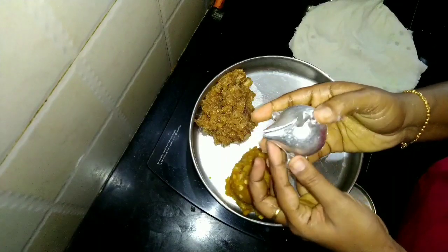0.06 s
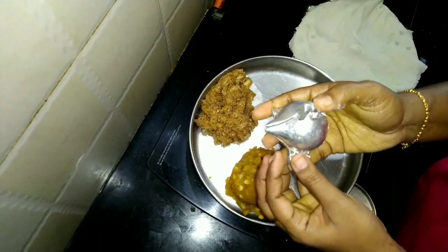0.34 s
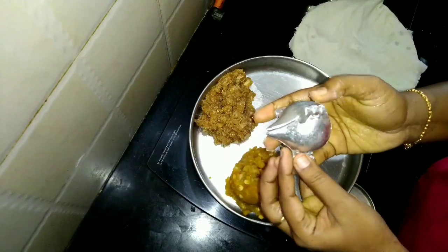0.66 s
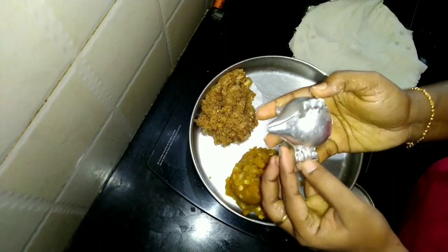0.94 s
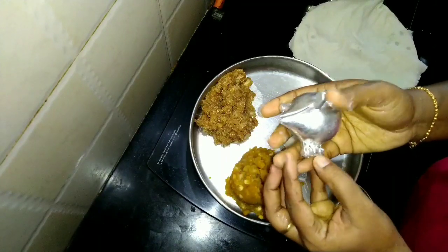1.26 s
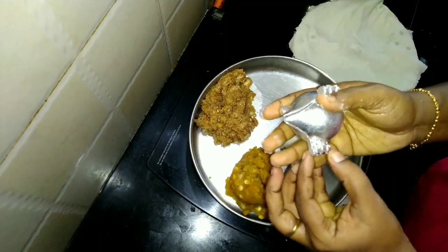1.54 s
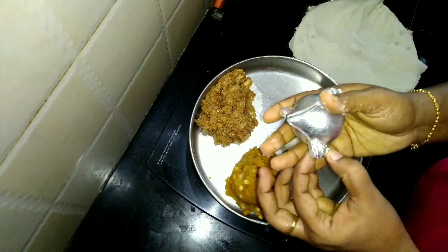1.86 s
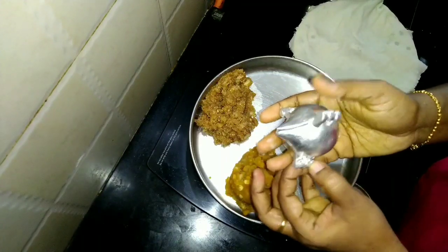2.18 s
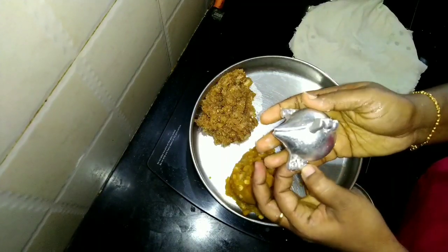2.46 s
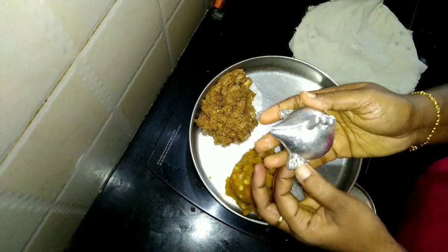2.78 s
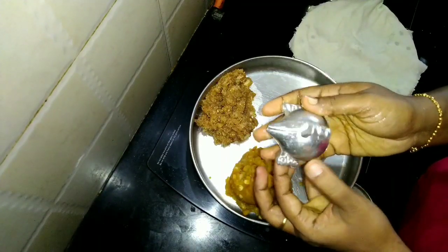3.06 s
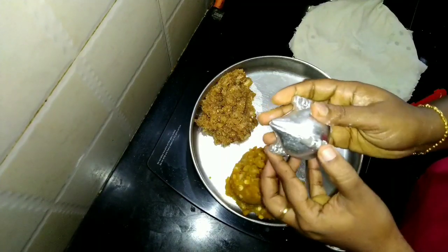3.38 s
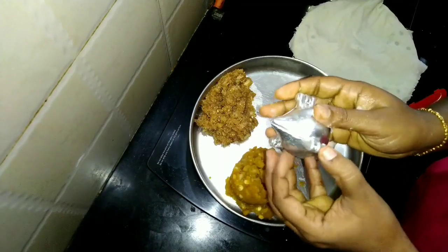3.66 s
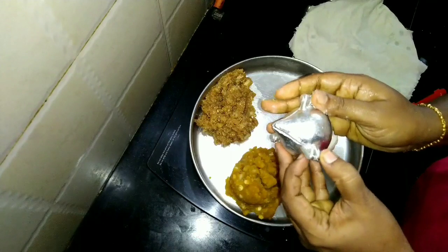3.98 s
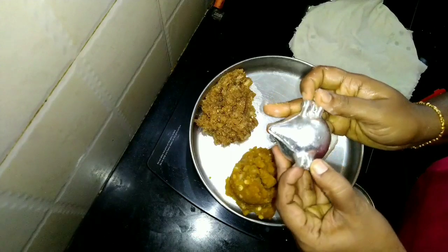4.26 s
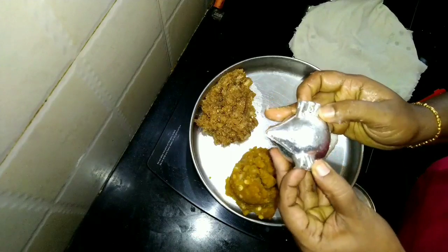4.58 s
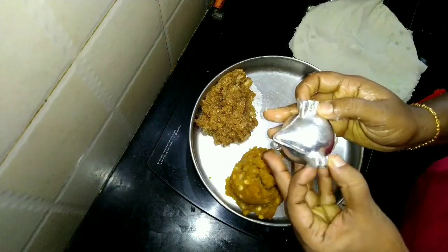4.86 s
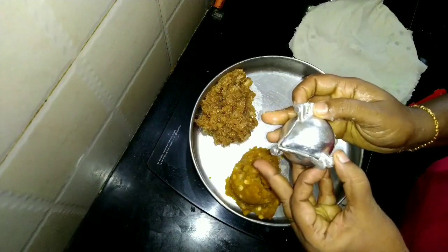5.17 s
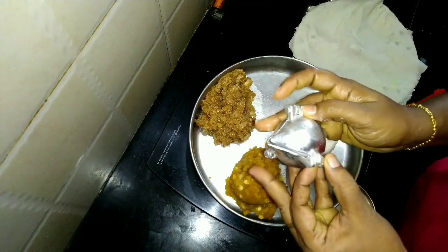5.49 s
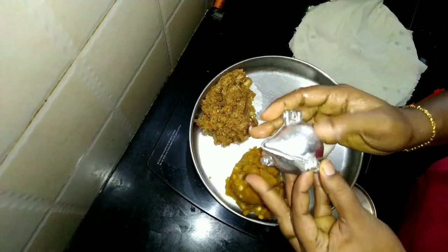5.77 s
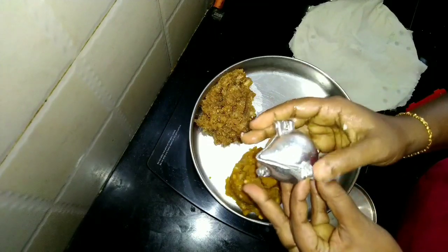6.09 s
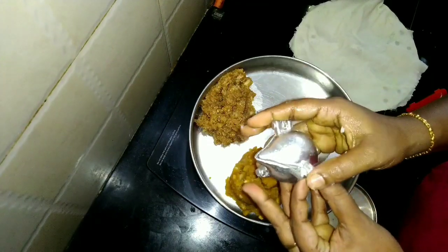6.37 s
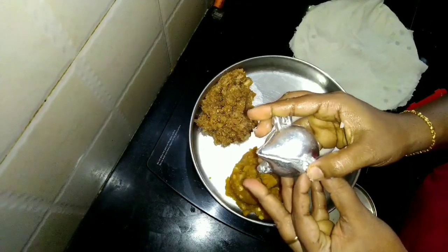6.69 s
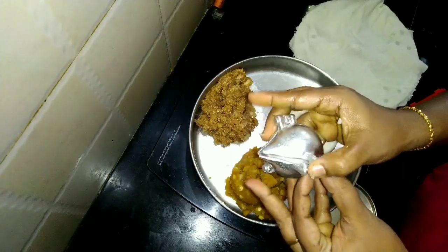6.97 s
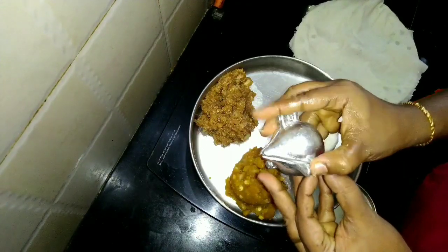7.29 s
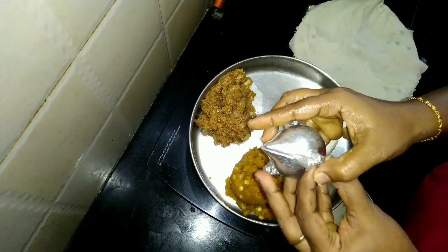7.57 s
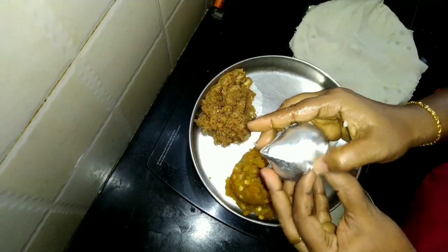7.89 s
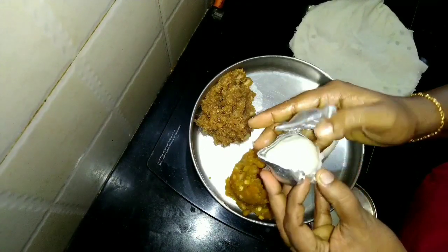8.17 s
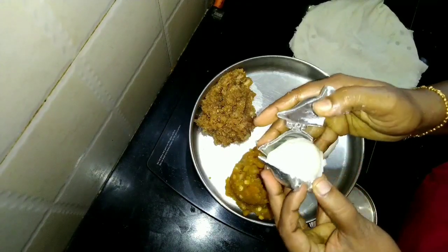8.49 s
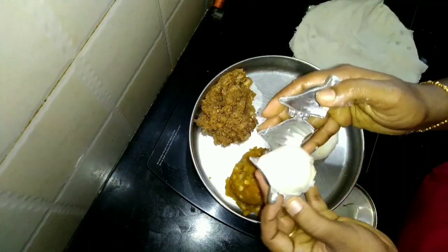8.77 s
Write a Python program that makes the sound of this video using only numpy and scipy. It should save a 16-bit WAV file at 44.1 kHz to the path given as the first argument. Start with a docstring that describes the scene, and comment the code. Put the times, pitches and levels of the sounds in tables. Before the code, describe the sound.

A quiet kitchen holds a faint refrigerator hum, light hiss and the dull drone of distant traffic throughout. From about 0.5 to 1.5 seconds, soft low bumps buffet the microphone on the left side. After a lull, a denser, stronger spell of bumps runs from 3.7 to 5 seconds, loudest just after 4, with very faint, brief high swishes as fingers work a small metal mould. At 5.6 seconds the mould gives one short dull tick, close and slightly left. A few more barely audible swishes come between 6.3 and 7.5 seconds. A short, firm cluster of low bumps lands around 6.9 seconds, with weaker ones near 7.3 to 7.5. The far traffic swells gently around 7 seconds, and the hiss lifts slightly with the louder bumps. Only hum, hiss and faint engine drone remain until the end, near 9 seconds.

```python
"""Soft low bumps buffet the left microphone port in spells, each push ringing its resonant bass cut.
In a quiet kitchen two hands ease a small metal mould open, and one dull tick rings in damped modes.
Narrow bands of noise make faint, brief high swishes. A refrigerator hums at harmonics of its rotor
and the mains, and far traffic drones through the walls. The recorder's noise suppressor raises
its gain with the louder spells, so the hiss rises with them."""
import sys
import numpy as np
from scipy import signal
from scipy.fft import rfft, irfft
from scipy.io import wavfile
from scipy.ndimage import uniform_filter1d, minimum_filter1d

SR = 44100
rng = np.random.default_rng(int(sys.argv[2]) if len(sys.argv) > 2 else 0)


def int16_out(signal):
    """Quantize to a 16-bit WAV file."""
    q = np.round(np.clip(np.atleast_2d(signal).T, -1, 1) * 32767)
    wavfile.write(sys.argv[1], SR, q.astype(np.int16))


N = 389844
T = np.arange(N) / SR

# Room murmur. Each row: frequency in Hz, relative spectral density in dB.
ROOM_SPECTRUM = [(20, -43), (40, -17.5), (59, 1.5), (82, -9), (150, -7.5), (185, -12), (240, -13),
                 (305, -13.5), (370, -19), (600, -23), (1000, -34.5), (2500, -48)]
# Likeness of the room sound at the two ports. Each row: frequency in Hz, correlation from 0 to 1.
ROOM_COHERENCE = [(60, 0.72), (300, 0.87), (700, 0.75), (1500, 0)]
# Microphone hiss. Each row: frequency in Hz, relative spectral density in dB.
HISS_SPECTRUM = [(100, -9.5), (800, 4), (2000, 1.5), (4200, -0.5), (6200, -5), (7500, -13), (8600, -13),
                 (10500, -5.5), (12500, -4.5), (15000, -7.5)]
# Faint electronic whistles. Each row: frequency in Hz, left level in dB, right level in dB.
WHISTLES = [(2589, -93, -93), (4640, -100, -92), (5797, -100, -87), (9275, -105, -94), (10438, -105, -93),
            (13915, -94, -91), (14755, -88, -100)]
# Compressor tones. Each row: multiple of the rotor speed, level in dB, right-port lag in radians.
ROTOR_HARMONICS = [(3, -77.5, -1.5), (4, -64.5, -0.021), (5, -70.5, -0.87), (8, -77.5, 1.45),
                   (9, -75, -1.9), (10, -61.5, 0.18), (11, -77.5, -2.1), (12, -87, 2.2), (13, -83, 1.44),
                   (14, -82.5, 3), (15, -82.5, 1.75), (19, -85, 1.5)]
# Magnetic hum. Each row: multiple of the mains frequency, level in dB, right-port lag in radians.
MAINS_HARMONICS = [(2, -69, 0.02), (3, -76.5, 0.014), (4, -65, 0.037)]
# Course of a thin tone. Each row: time in seconds, frequency in Hz, level in dB.
TONE_COURSE = [(0, 331, -77), (.55, 326.9, -67), (1.6, 329.4, -70.5), (2.9, 330.7, -71), (4, 329.4, -71),
               (8.84, 330.5, -80.5)]
# Pulls of far engines. Each row: start and end in seconds, starting and settled rate in Hz,
# starting and final level in dB.
ENGINE_PULLS = [(0, 2.4, 54.4, 54.26, -63.5, -57.5), (2.6, 3.9, 64, 65.8, -61, -59),
                (5.55, 6.17, 53.3, 55.36, -51.5, -49), (6.6, 10.2, 69.8, 68.7, -66.5, -53),
                (7.68, 9.7, 103.9, 104.6, -57, -74)]
# Traffic drone. Each row: frequency in Hz, relative spectral density in dB.
TRAFFIC_SPECTRUM = [(60, -32), (115, -11.5), (140, 3.5), (160, 4), (195, -11), (240, -9.5), (300, -4.5),
                    (360, -15.5), (700, -28), (1400, -58)]
# Its one swell. In order: time of the top in seconds, level there in dB, rise and fall in dB per second.
TRAFFIC_SWELL = (7, -59, 2, 6.5)
# Prominent pushes at the left port. Each row: centre in seconds, level in dB, pitch in Hz.
BUMPS = [(0.452, -37.5, 86), (0.471, -31.5, 90), (0.5127, -40, 80), (0.562, -42.5, 58), (0.625, -47, 58),
         (0.7447, -34, 64), (0.8515, -37, 85), (0.8845, -33, 85), (0.9252, -33.5, 68.4), (0.983, -35, 56),
         (1.043, -35.5, 76), (1.091, -40.5, 62), (1.224, -35, 88.6), (1.248, -42, 85), (1.298, -33, 73),
         (1.356, -40, 68), (3.7317, -34, 82), (3.786, -38.5, 85), (3.8155, -31, 87.5), (3.8951, -29, 64),
         (3.9633, -29.5, 78), (3.9847, -25, 71.4), (4.019, -33, 69), (4.0495, -36, 100), (4.068, -31, 105),
         (4.0804, -30.5, 128.5), (4.1135, -21.5, 94), (4.1447, -26, 77), (4.2113, -37, 85),
         (4.263, -26, 83), (4.277, -23.5, 112.5), (4.306, -26, 90), (4.3209, -26, 71), (4.354, -35, 121),
         (4.367, -28.5, 89), (4.396, -31, 80.5), (4.4343, -26, 90.5), (4.4576, -29, 95), (4.479, -32.5, 80),
         (4.5248, -29.5, 85), (4.591, -34.5, 70), (4.6087, -34, 73.7), (4.6508, -30.5, 102),
         (4.6758, -28.5, 83), (4.7047, -31.5, 89), (4.7248, -32.5, 85), (4.757, -36, 62), (4.885, -41, 64),
         (4.954, -44, 62.5), (6.836, -37.5, 65.7), (6.8676, -23.5, 101.4), (6.8818, -23.5, 87),
         (6.9013, -25, 88), (6.924, -26.5, 98), (6.9907, -22, 91), (7.0442, -35, 66), (7.3013, -33, 81),
         (7.344, -48, 62), (7.428, -33.5, 95.6), (7.438, -44, 80)]
# Spells of buffeting. Each row: start and end in seconds, level at the middle in dB,
# drop toward the ends in dB (negative for a rise), lowest pitch in Hz.
BUFFET_SPELLS = [(0.452, 0.58, -53, 2, 55), (0.851, 1.46, -53, -2, 54), (3.699, 3.93, -49, -6.5, 60),
                 (3.962, 4.38, -42.5, 7, 72), (4.421, 4.782, -46.5, 4, 63.6), (4.838, 4.982, -59, -7, 55),
                 (6.85, 6.96, -43, -1, 85), (7.3, 7.56, -60, -9, 66)]
# Faint, brief high swishes. Each row: start and end in seconds, level in dB, band centre in Hz.
HIGH_SWISHES = [(3.75, 3.82, -74, 4970), (3.8, 3.89, -79, 6400), (4.05, 4.14, -73, 4950),
                (4.33, 4.45, -75, 4980), (6.33, 6.37, -74, 5000), (6.4, 6.5, -77, 6100),
                (6.4, 6.48, -73, 3400), (6.65, 6.72, -75, 4950), (7.15, 7.5, -82, 3900)]
# The dull tick. In order: start in seconds, level in dB.
TICK = (5.5802, -27.5)
# Its modes. Each row: frequency in Hz, relative level in dB, time to decay by 60 dB in seconds.
TICK_MODES = [(357, -3, 0.0075), (714, -2, 0.0053), (1300, -14, 0.008), (4330, -11, 0.007)]


def amp(db):
    """Amplitude grows tenfold for every 20 dB."""
    return 10 ** (np.asarray(db) / 20)


def unit_rms(x):
    """Dividing by the root mean square gives a signal unit power."""
    return x / np.sqrt(np.mean(x ** 2) + 1e-20)


def at_frequency(table, hz):
    """A spectrum is interpolated on a logarithmic frequency axis."""
    table_hz, values = np.transpose(table)
    return np.interp(np.log(hz + 1), np.log(table_hz), values)


def drift(hz):
    """Low-passed noise of unit power fluctuates at rates up to about hz."""
    bin_hz = np.fft.rfftfreq(N, 1 / SR)
    return unit_rms(irfft(rfft(rng.standard_normal(N)) / (1 + (bin_hz / hz) ** 4), N))


def running_phase(hz):
    """Phase is the integral of frequency, here from a random start."""
    return 2 * np.pi * (np.cumsum(hz * np.ones(N)) / SR + rng.random())


def gate(start, end, attack_s, release_s, t=T):
    """An envelope grows exponentially to 1 at start, holds, and decays after end."""
    return np.exp(np.minimum(t - start, 0) / attack_s - np.maximum(t - end, 0) / release_s)


def progress(start, end, t=T):
    """A linear ramp runs from 0 at start to 1 at end."""
    return np.clip((t - start) / (end - start), 0, 1)


def noise_pair(spectrum, coherence=None):
    """Coloured noise at two ports is coherent to the extent that they share a component."""
    hz = np.fft.rfftfreq(N, 1 / SR)
    left, independent = rfft(rng.standard_normal((2, N)))
    shared = np.clip(at_frequency(coherence, hz), -1, 1) if coherence else 0
    right = shared * left + np.sqrt(1 - shared ** 2) * independent
    return unit_rms(irfft(np.array([left, right]) * amp(at_frequency(spectrum, hz)), N))


def noise_floor(room_db=-58, hiss_db=-63, flicker_db=0.51, patchy_db=0.5):
    """Room murmur is partly coherent between the ports; each adds its own hiss and faint whistles."""
    whistles = sum(amp([[left_db], [right_db]]) * np.sqrt(2) * np.sin(running_phase(hz))
                   for hz, left_db, right_db in WHISTLES)
    # the hiss wavers in small patches of frequency and time
    spectrogram = signal.stft(noise_pair(HISS_SPECTRUM), nperseg=1024)[2]
    patches = uniform_filter1d(rng.standard_normal(spectrogram.shape[1:]), size=24, axis=0)
    patches = unit_rms(uniform_filter1d(patches, size=10, axis=1))
    hiss = signal.istft(spectrogram * amp(patchy_db * patches), nperseg=1024)[1][:, :N]
    murmur = amp(room_db) * noise_pair(ROOM_SPECTRUM, ROOM_COHERENCE)
    return murmur + amp(hiss_db + flicker_db * drift(32)) * hiss + whistles


def fridge(rotor_hz=48.9, mains_hz=50, waver=0.00026, flutter_db=0.5, left_db=1.6, mono_below_hz=300):
    """Beating: the rotor slips behind the mains, so their fourth harmonics beat about 4 times a second."""
    out = np.zeros((2, N))
    for base_hz, harmonics in ((rotor_hz, ROTOR_HARMONICS), (mains_hz, MAINS_HARMONICS)):
        phase = running_phase(base_hz * (1 + waver * drift(0.52)))
        for multiple, db, lag in harmonics:
            # long waves reach both ports alike; shorter ones are louder on the left
            lean_db = left_db * (multiple * base_hz > mono_below_hz)
            port_gains = amp([[db + lean_db], [db - lean_db]])
            out += port_gains * np.sqrt(2) * np.cos(multiple * phase - np.array([[0], [lag]]))
    return out * amp(flutter_db * drift(13))


def fading_tone(waver_hz=1.07):
    """Slow frequency modulation makes a thin tone waver as it rises from the hum and fades."""
    times, *columns = np.transpose(TONE_COURSE)
    hz, db = (np.interp(T, times, column) for column in columns)
    return amp(db) * np.sqrt(2) * np.sin(running_phase(hz + waver_hz * drift(3.7)))


def far_engines(settle_s=0.31, waver=0.0065, octave_db=-17):
    """Walls transmit only an engine's lowest harmonics; each pull relaxes toward a steady rate."""
    out = np.zeros(N)
    for start, end, from_hz, to_hz, from_db, to_db in ENGINE_PULLS:
        hz = to_hz + (from_hz - to_hz) * np.exp(-np.maximum(T - start, 0) / settle_s)
        phase = running_phase(hz * (1 + waver * drift(3.77)))
        level = amp(from_db + (to_db - from_db) * progress(start, end))
        level *= gate(start, end, attack_s=0.26, release_s=0.024)
        out += level * (np.sin(phase) + amp(octave_db) * np.sin(2 * phase))
    return np.sqrt(2) * out


def traffic():
    """Walls act as a low-pass filter, leaving of far traffic a dull drone that swells once."""
    top_s, top_db, rise, fall = TRAFFIC_SWELL
    level = amp(top_db - np.maximum(rise * (top_s - T), fall * (T - top_s)))
    return level * noise_pair(TRAFFIC_SPECTRUM, ROOM_COHERENCE)


def pressure_pulse(hz, width_cycles):
    """A push is a Gaussian wave packet: one crest between two troughs, centred in 0.1 s."""
    cycles = hz * np.arange(-(SR // 20), SR // 20 + 1) / SR
    return np.cos(2 * np.pi * cycles) * np.exp(-(cycles / width_cycles) ** 2)


def swarm(low_hz, t, high_hz=165, each_size_per_s=35, tilt_db=-4.5):
    """Shot noise: pushes of six sizes arrive at random, and the quicker ones are weaker."""
    out = np.zeros(len(t))
    for smallness in np.linspace(0, 1, num=6):
        pushes = rng.choice([-1, 1], len(t)) * (rng.random(len(t)) < each_size_per_s / SR)
        pulse = pressure_pulse(low_hz * (high_hz / low_hz) ** smallness, width_cycles=0.66)
        out += amp(tilt_db * smallness) * signal.oaconvolve(pushes, pulse, "same")
    return unit_rms(out)


def buffeting():
    """Amplitude modulation shapes the swarm into spells that arch or sag at the middle."""
    out = np.zeros(N)
    for start, end, db, end_drop_db, low_hz in BUFFET_SPELLS:
        first = round(start * SR) - SR // 10
        span = slice(first, first + SR)
        t = T[span]
        level = amp(db - end_drop_db * (2 * progress(start, end, t) - 1) ** 2)
        level *= gate(start, end, attack_s=0.017, release_s=0.04, t=t)
        out[span] += level * swarm(low_hz, t)
    return out


def port_resonance(pressure, corner_hz=46, q=2.93, floor_hz=33):
    """The microphone's bass cut is an underdamped resonator: each push leaves a short low wobble."""
    omega = 2 * np.pi * corner_hz
    ringing = signal.lfilter(*signal.bilinear([1, 0, 0], [1, omega / q, omega ** 2], SR), pressure)
    return signal.sosfiltfilt(signal.butter(3, floor_hz, "high", fs=SR, output="sos"), ringing)


def port_bumps(trim_db=-0.3, leak_db=-33, edge_db=-28.5, reference_hz=77.4, edge_db_per_octave=41):
    """Large pushes superpose on the buffeting at the left port; little leaks to the right."""
    pushes = np.zeros(N)
    edge = pressure_pulse(hz=195, width_cycles=0.91)
    for centre_s, db, hz in BUMPS:
        # a quicker push has a sharper crest, which reaches up to about 300 Hz
        sharpness = amp(edge_db + edge_db_per_octave * np.log2(hz / reference_hz))
        pulse = pressure_pulse(hz, width_cycles=0.71) + sharpness * edge
        first = round(centre_s * SR) - len(pulse) // 2
        pushes[first:first + len(pulse)] += amp(db + trim_db) * pulse
    left = port_resonance(pushes + buffeting())
    return np.array([left, amp(leak_db) * left])


def faint_swishes(half_width_hz=550):
    """Band-pass filtering of noise gives faint, brief swishes in narrow bands around 3-6 kHz."""
    out = np.zeros((2, N))
    hz = np.fft.rfftfreq(N, 1 / SR)
    white_spectrum = rfft(rng.standard_normal((2, N)))
    for start, end, db, centre_hz in HIGH_SWISHES:
        swish = unit_rms(irfft(white_spectrum / (1 + ((hz - centre_hz) / half_width_hz) ** 2), N))
        out += amp(db) * gate(start, end, attack_s=0.013, release_s=0.02) * swish
    return out


def tick(right_db=-11, right_delay_s=0.00033, thud_top_hz=1400, thud_bottom_hz=170, ping_rise_s=0.0007):
    """A knock nearer the left port excites damped modes: the low ones thud, the high one pings."""
    start, db = TICK
    t = np.maximum(T[:SR // 20] - np.array([[0], [right_delay_s]]), 0)
    thud, ping = np.zeros((2, *t.shape))
    for hz, mode_db, t60 in TICK_MODES:
        part = thud if hz < thud_top_hz else ping
        part += amp(mode_db - 60 * t / t60) * np.sin(2 * np.pi * hz * t)
    thud = signal.sosfilt(signal.butter(4, thud_top_hz, fs=SR, output="sos"), thud)
    thud = signal.sosfilt(signal.butter(2, thud_bottom_hz, "high", fs=SR, output="sos"), thud)
    ping *= 1 - np.exp(-t / ping_rise_s)
    knock = -amp(db) * (thud + ping) * amp([[0], [right_db]])
    return np.pad(knock, ((0, 0), (round(start * SR), N)))[:, :N]


def scene():
    """By superposition, the sources add at each of the two ports."""
    nearby = port_bumps() + faint_swishes() + tick()
    return nearby + fridge() + fading_tone() + far_engines() + traffic() + noise_floor()


def record(dry, threshold_db=-49.5, knee_db=1.2, depth_db=2.5, open_db=0.91,
           hold_s=0.11, close_s=0.2, detector_above_hz=70, band_limit_hz=15150):
    """Downward expansion: a mild suppressor opens fast on sound, holds and closes; a low-pass follows."""
    detected = signal.sosfilt(signal.butter(2, detector_above_hz, "high", fs=SR, output="sos"), dry)
    power = uniform_filter1d((detected ** 2).mean(0), size=700)
    power_db = 10 * np.log10(abs(power) + 1e-12)
    wanted = 0.5 + 0.5 * np.tanh((power_db - threshold_db) / (2 * knee_db))
    hold = round(hold_s * SR) + 1
    held = -minimum_filter1d(-wanted, size=hold, origin=(hold - 1) // 2)  # maximum over the last hold_s
    fall = T / close_s
    released = np.maximum.accumulate(held + fall) - fall  # closes along a straight ramp
    opening = uniform_filter1d(released, size=1500)
    suppressed = dry * amp(open_db - depth_db * (1 - opening))
    low_pass = signal.firwin(1023, band_limit_hz, window=("kaiser", 9), fs=SR)
    return signal.oaconvolve(suppressed, low_pass[None], "same")


dry = scene()
out = record(dry)
int16_out(out)
```